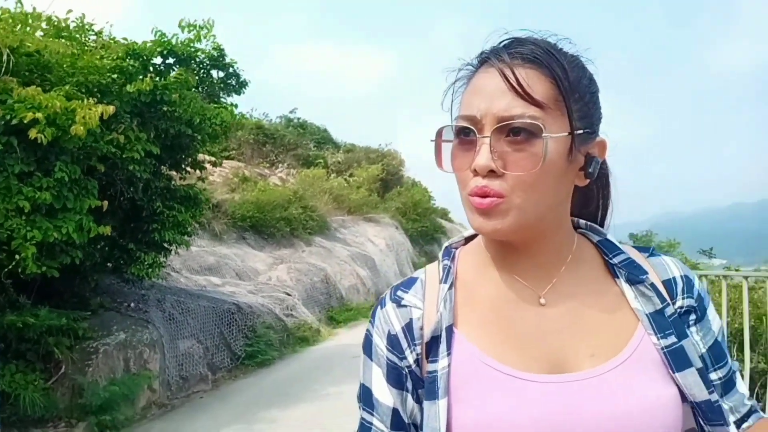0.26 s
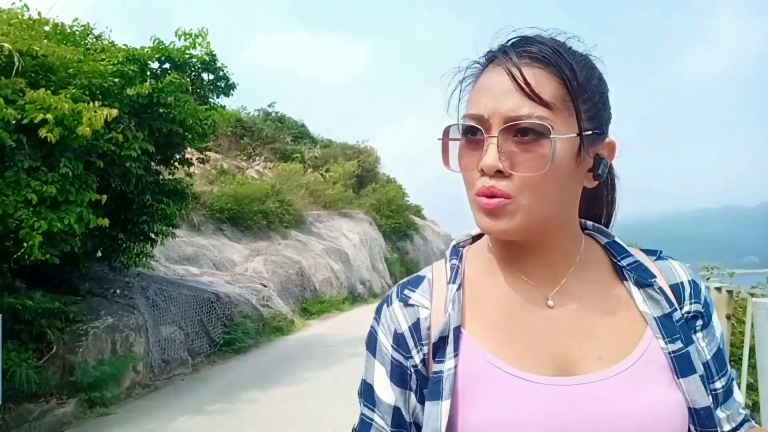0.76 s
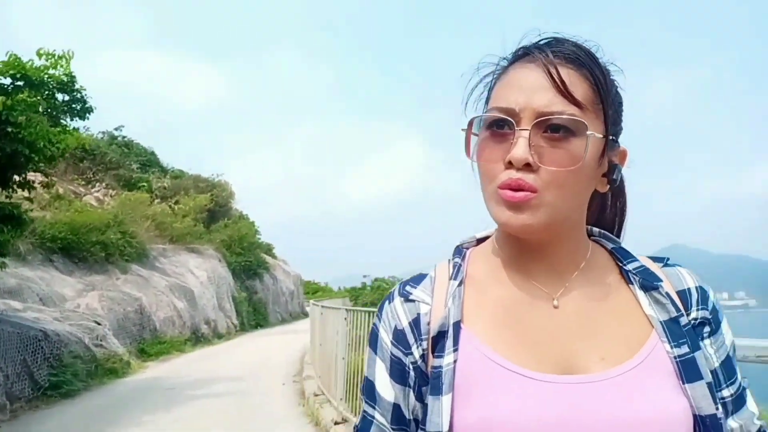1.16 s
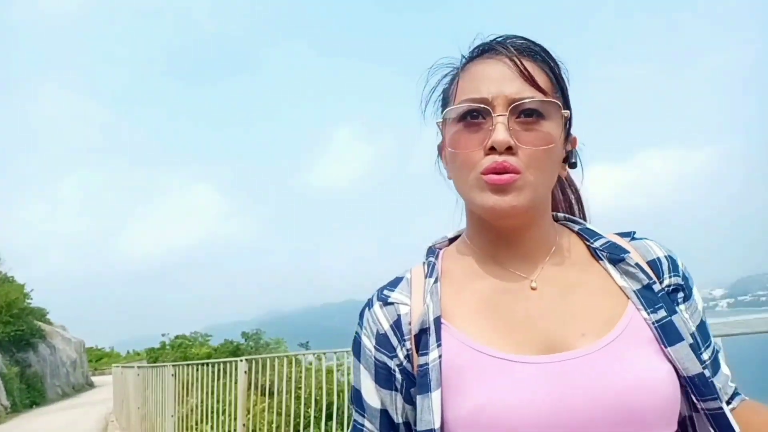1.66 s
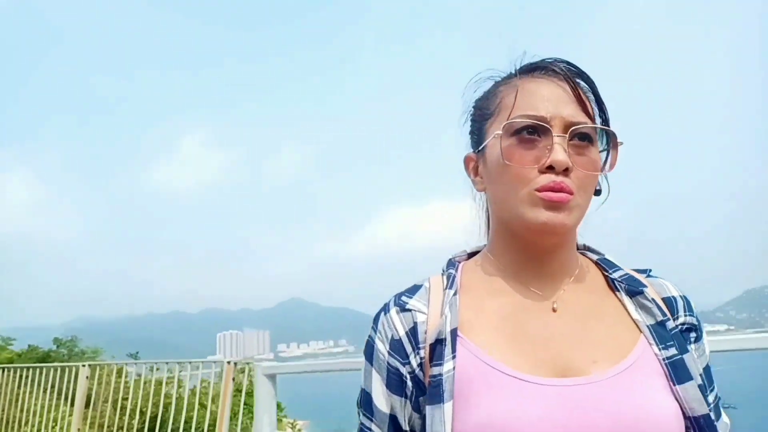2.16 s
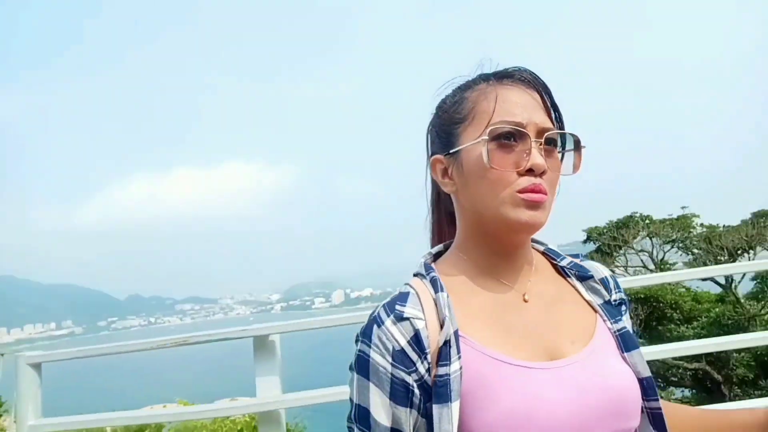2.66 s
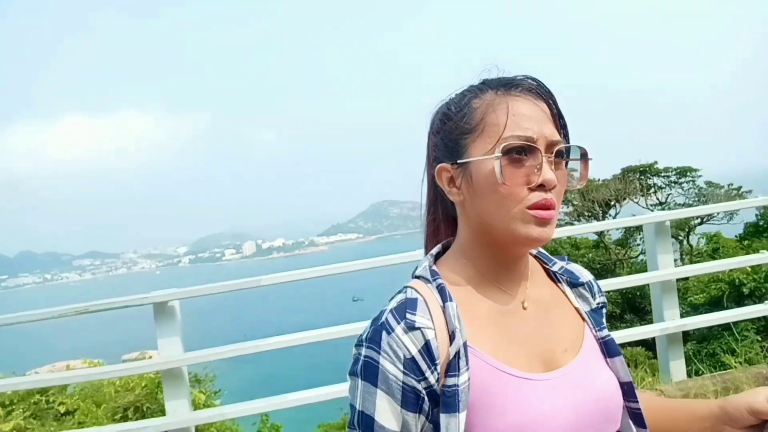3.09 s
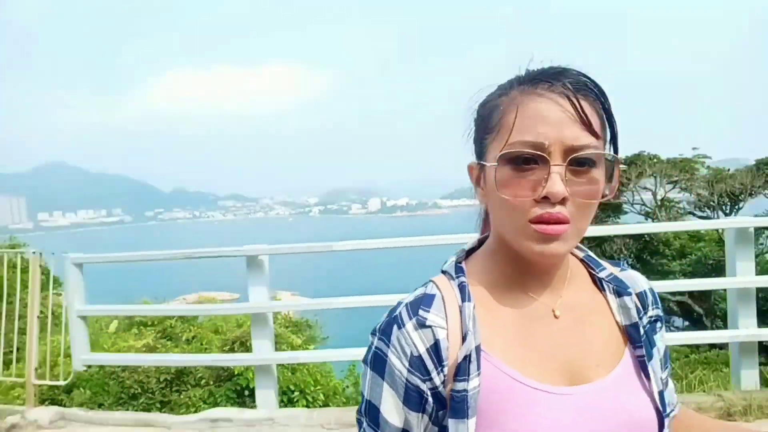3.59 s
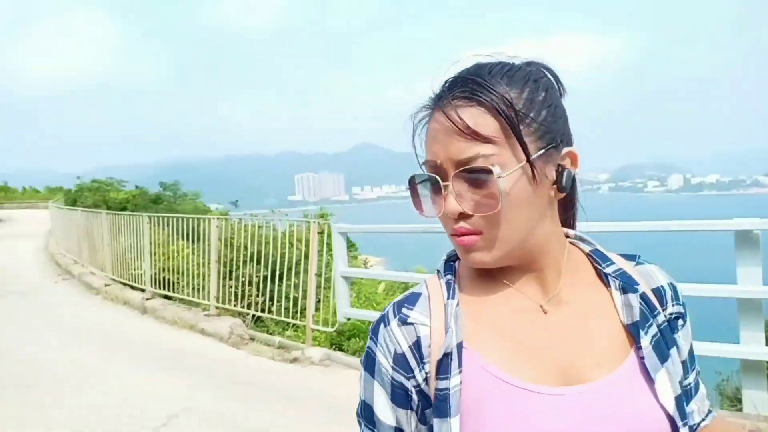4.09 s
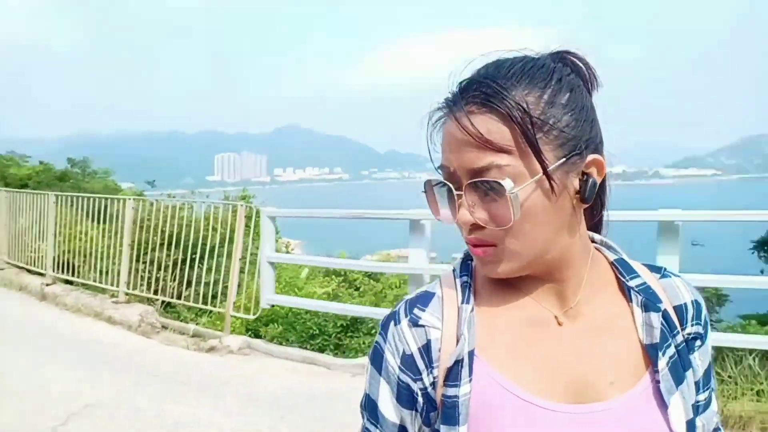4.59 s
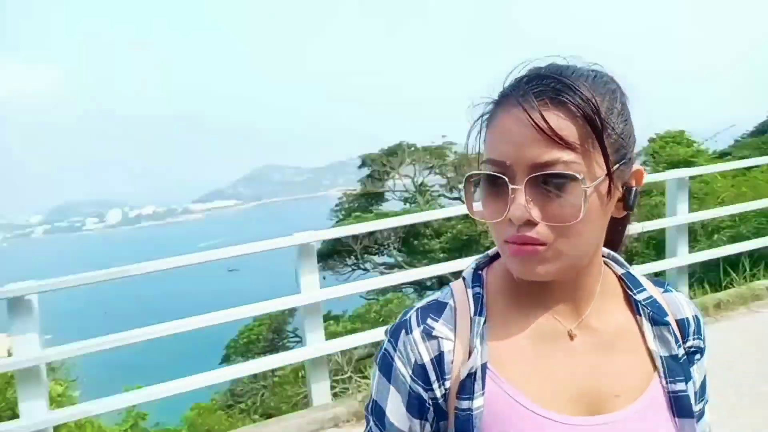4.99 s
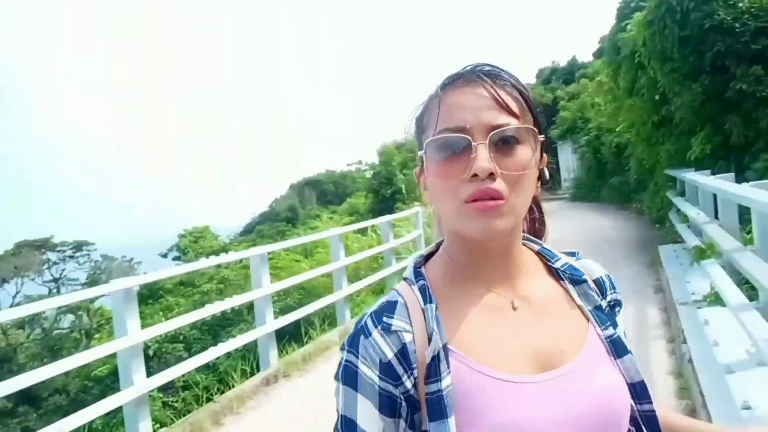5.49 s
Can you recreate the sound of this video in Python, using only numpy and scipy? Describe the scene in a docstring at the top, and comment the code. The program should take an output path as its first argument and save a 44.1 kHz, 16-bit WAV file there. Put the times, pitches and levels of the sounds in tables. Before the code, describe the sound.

Irregular low wind buffets rumble against the microphone over a pulsing cicada buzz, faint far birds and occasional small handling ticks.

```python
"""A windy hillside road, on a hand-held phone. Cicadas buzz their ribbed drums: one kind throbs near
5 kHz as the bellies pump, another swells and breaks off higher up, and a far chorus hisses over a hush
of leaves and sea. Small birds chirp in the distance. Right at the microphone, gusts buffet the port,
and now and then the grip clicks and clothes rustle."""
import sys
import numpy as np
from scipy import signal
from scipy.fft import rfft, irfft, next_fast_len
from scipy.io import wavfile
from scipy.ndimage import uniform_filter1d

SR = 44100
rng = np.random.default_rng(int(sys.argv[2]) if len(sys.argv) > 2 else 0)


def wav_out(sig):
    """Save sig, one row per channel (or a flat mono array), as 16-bit PCM at SR to the path in sys.argv[1]."""
    wavfile.write(sys.argv[1], SR, np.round(np.clip(np.atleast_2d(sig).T, -1, 1) * 32767).astype(np.int16))


N = 253262

# hush of leaves and sea: freq_hz, density_db
HUSH_SPECTRUM = [(30, -44), (60, -9.5), (140, -3), (237, -5.5), (312, -7), (751, -17), (1300, -25),
                 (2150, -29), (4240, -30.5), (6330, -34), (9000, -26), (12100, -37), (16000, -26)]
# rise and fall of the hush: time_s, level_db
HUSH_LEVEL = [(0, -47.5), (.6, -46.5), (2.05, -45), (2.65, -48), (3.05, -44.5), (3.9, -46), (4.55, -49),
              (4.95, -44), (5.25, -49.5), (5.74, -46.5)]
# wind at the microphone port: time_s, level_db
GUST_LEVEL = [(0, -41), (.17, -42.5), (.34, -54), (.42, -29), (.75, -35), (1.1, -41), (1.3, -34.5),
              (1.5, -38), (1.8, -43.5), (2.5, -50), (2.75, -41), (2.97, -34), (3.15, -16.5), (3.31, -34.5),
              (3.85, -31.5), (4.12, -35.5), (4.22, -43.5), (4.6, -51), (4.85, -45), (5.6, -47.5),
              (5.74, -42)]
# rumble of small eddies: freq_hz, density_db
EDDY_SPECTRUM = [(15, -48), (30, -31), (57, -4), (80, 0), (120, -3.5), (168, -8.5), (318, -21.5),
                 (490, -38), (900, -75)]
# strong eddies hitting the microphone: time_s, peak_db, width_ms
BUFFETS = [(0.391, -20, 29), (0.444, -20, 8.1), (0.469, -21, 10.3), (0.541, -14.5, 5.1),
           (0.564, -18.5, 4.6), (0.61, -22.5, 17), (0.655, -16.5, 13.8), (0.7, -17, 11.5), (.729, -26, 7.7),
           (.822, -24.5, 6.3), (0.841, -19, 12), (0.874, -23, 13.4), (0.959, -21, 11.8), (1.285, -27, 17.5),
           (1.321, -21.5, 19), (1.38, -20, 17), (1.418, -27, 17), (1.451, -20, 9.2), (1.636, -17, 10),
           (2.696, -26.5, 16.3), (2.836, -22.5, 5.1), (2.867, -10.5, 20), (2.894, -13, 13.9),
           (2.929, -22, 20), (3.01, -20.5, 20.5), (3.051, -12, 8.7), (3.084, -10.5, 5.3), (3.116, -2.5, 11),
           (3.178, -13.5, 18), (3.217, -14, 7.5), (3.242, -13.5, 5.1), (3.265, -23, 6.2),
           (3.347, -13.5, 5.6), (3.4, -22.5, 8.9), (3.444, -22, 25), (3.488, -21.5, 11), (3.598, -26, 8.2),
           (3.63, -20.5, 16.5), (3.655, -16.5, 9.2), (3.688, -18, 9), (3.811, -10.5, 9.1),
           (3.861, -17, 13.3), (3.939, -25.5, 25.4), (4.02, -21.5, 14), (4.09, -26.5, 10.4),
           (4.154, -23, 31), (4.752, -22.5, 21), (5.44, -27.5, 9.4), (5.462, -27, 13.5)]
# drum resonances of the throbbing cicadas: centre_hz, width_hz, gain_db
TYMBAL_MODES = [(4910, 220, 2), (5095, 300, 7), (5222, 354, 8), (5374, 160, -1.5)]
# their drone, before the throb: time_s, level_db
DRONE_LEVEL = [(0, -55.5), (.3, -54), (.65, -50.5), (1.2, -52), (1.8, -52.5), (2.1, -49), (2.65, -53),
               (2.9, -50), (3.35, -46.5), (3.9, -48), (4.3, -50), (4.62, -52.5), (4.85, -48.5), (5.25, -48),
               (5.55, -48.5), (5.74, -49.5)]
# bouts of bellies pumping in step: middle_s, length_s, crest_s, pump_hz, depth_db
THROB_BOUTS = [(.1, .6, .18, 7.8, 5), (1.3, 1.6, 1.16, 7.5, 6.5), (2.75, 1.9, 2.803, 8.05, 10.5),
               (4.2, 1.1, 4.215, 7.6, 5), (5.0, .9, 5.129, 7.4, 9), (5.6, .55, 5.59, 7.6, 5)]
# the far chorus in two bands: time_s, low_db, high_db
CHORUS_LEVELS = [(0.0, -66, -59), (0.38, -61.5, -62), (1.93, -56.5, -56), (2.19, -61, -57),
                 (2.61, -60, -57), (3.1, -62, -56), (3.49, -51.5, -54), (3.77, -67, -57), (3.97, -68, -63),
                 (4.3, -65, -63), (4.44, -77, -69), (4.68, -66, -74), (4.87, -55, -66), (5.2, -69, -74),
                 (5.5, -74, -67), (5.74, -59, -56)]
# resonances of its low and its high band: centre_hz, width_hz, gain_db
CHORUS_LOW_MODES = [(8260, 930, 0)]
CHORUS_HIGH_MODES = [(14400, 1600, -8.5), (15470, 640, 1)]
# body resonances of the swelling cicada: centre_hz, width_hz, gain_db
SWELL_MODES = [(7430, 730, 0), (9010, 2260, 4), (10250, 1400, -0.5)]
# its calls: start_s, break_off_s, top_db
SWELL_CALLS = [(.6, 1.0, -60), (1.89, 2.365, -49), (3.043, 3.73, -54), (3.9, 4.222, -60),
               (4.6, 5.027, -51.5)]
# ringing of the plastic grip: pitch_hz, gain_db, t60_ms
GRIP_MODES = [(1700, 0.5, 4.8), (2960, -5.5, 2.8), (4020, 9.5, 1.85), (6300, -2.5, 2.5), (8470, 5, 4.6),
              (12900, 5.5, 5.9)]
# clicks of the grip: start_s, peak_db, centre_hz, spread_octaves
GRIP_CLICKS = [(.306, -35.5, 2600, 0.33), (.33, -35.5, 3200, 0.4), (0.6719, -18.5, 4000, 0.23),
               (0.6828, -18, 5430, 0.57), (0.868, -27.5, 3280, 0.33), (1.004, -43, 1500, 0.43),
               (1.3224, -35, 3000, 1.1), (1.433, -36, 3000, 0.48), (1.4985, -37, 2500, 0.73),
               (2.611, -38.5, 1500, .3), (3.496, -37, 4200, .2), (3.715, -33, 4000, 1.1),
               (3.8736, -30.5, 9000, 0.7), (4.675, -45, 2500, .8), (5.1858, -26.5, 3000, 1.2),
               (5.2024, -32, 2600, 0.36), (5.4042, -37, 3600, .4)]
# far birds, clear falling whistles: start_s, length_s, pitch_hz, level_db
BIRD_WHISTLES = [(.39, .026, 3280, -60), (.735, .027, 3260, -55), (.78, .02, 3300, -60),
                 (1.69, .03, 3290, -60), (1.73, .025, 3200, -67), (2.4, 0.023, 3260, -64),
                 (2.45, 0.015, 3300, -59), (2.475, .018, 3190, -60), (2.92, 0.021, 3280, -60),
                 (3.245, 0.045, 3250, -58), (3.525, 0.03, 3300, -53), (3.578, .033, 3320, -60),
                 (3.695, .015, 3280, -59), (3.91, 0.042, 3200, -61), (4.04, .03, 3350, -58),
                 (4.092, .04, 3270, -55), (4.135, 0.042, 3300, -59), (4.648, .03, 3230, -65),
                 (4.68, 0.036, 3310, -61)]
# far birds, hoarse rising notes: start_s, length_s, pitch_hz, level_db
BIRD_RASPS = [(.55, .06, 2650, -59), (1.4, 0.043, 2760, -54.5), (2.31, 0.046, 2680, -55),
              (3.093, 0.028, 2820, -48), (3.185, 0.035, 2560, -56), (3.972, .025, 2720, -60),
              (4.105, 0.025, 2670, -55), (5.0, .056, 2690, -59)]
# rubbing cloth: freq_hz, density_db
CLOTH_SPECTRUM = [(500, 1), (1500, -3.5), (4200, 1.5), (6500, -3.5), (8500, -0.5), (12000, -8.5),
                  (15000, -4)]
# rustles close to the microphone: start_s, length_s, level_db
CLOTH_RUSTLES = [(3.418, 0.024, -34), (3.437, 0.021, -39.5), (3.877, 0.015, -53.5), (5.661, 0.023, -52),
                 (5.677, .05, -41.5)]


def undb(db):
    return 10 ** (np.asarray(db) / 20)


def unit(x):
    return x / np.sqrt(np.mean(x ** 2))


def curves(table):
    """The value columns of a timed table at every sample."""
    times, *columns = np.transpose(table)
    return [np.interp(np.arange(N) / SR, times, column) for column in columns]


def coloured(spectrum):
    """Noise of rms 1 with the given spectrum."""
    size = next_fast_len(N)
    hz, db = np.transpose(spectrum)
    bin_hz = np.arange(size // 2 + 1) * SR / size
    gain = undb(np.interp(np.log(bin_hz + 1), np.log(hz), db))
    return unit(irfft(rfft(rng.standard_normal(size)) * gain, size)[:N])


def ring(x, modes):
    """Steep resonances (each applied twice), summed."""
    out = 0
    for hz, width_hz, db in modes:
        b, a = signal.iirpeak(hz, hz / width_hz, fs=SR)
        out = out + undb(db) * signal.lfilter(b, a, signal.lfilter(b, a, x))
    return out


def wander(rate_hz):
    """Random steps at rate_hz, smoothed twice; rms 1."""
    hold = int(SR / rate_hz)
    steps = np.repeat(rng.standard_normal(N // hold + 1), hold)
    return unit(uniform_filter1d(uniform_filter1d(steps, hold), hold)[:N])


def add(out, start_s, piece):
    """Mixes a short sound in at start_s."""
    i = max(int(start_s * SR), 0)
    out[i:i + len(piece)] += piece[:N - i]


def leaves_and_sea():
    """A low wash of distant sea under leaves that stir fitfully."""
    hush = coloured(HUSH_SPECTRUM)
    sea = signal.sosfiltfilt(signal.butter(2, 1000., fs=SR, output="sos"), hush)
    leaves = undb(1.26 * wander(9)) * (hush - sea)
    return undb(curves(HUSH_LEVEL)[0]) * (sea + leaves)


def wind_on_microphone(deep_hz=75.4, lull_db=-41, buffet_hz=114.03, scatter_hz=9.17):
    """Small eddies rumble at the port; each strong one briefly shakes the membrane, sinking in pitch."""
    gust_db, eddies = curves(GUST_LEVEL)[0], coloured(EDDY_SPECTRUM)
    deep = signal.sosfiltfilt(signal.butter(2, deep_hz, fs=SR, output="sos"), eddies)
    deep_db = 0.7 * np.minimum(gust_db - lull_db, 0)  # the deepest eddies die away in lulls
    out = undb(gust_db + 4.1 * wander(30)) * (eddies - deep + undb(deep_db) * deep)
    t = np.arange(-SR // 10, SR // 10) / SR
    for time_s, peak_db, width_ms in BUFFETS:
        phase, chance = rng.random(2)
        widths = t / (width_ms / 1000)
        envelope = undb(peak_db) * np.exp(-np.log(16) * widths ** 2)
        hz = buffet_hz + 1.14 * (peak_db + 20) - 0.888 * (width_ms - 10)  # strong, short ones are higher
        pitch_hz = (hz + scatter_hz * (2 * chance - 1)) * np.exp(-.3 * np.tanh(widths))
        add(out, time_s - .1, envelope * np.cos(2 * np.pi * (np.cumsum(pitch_hz) / SR + phase)))
    return out


def tymbal_buzz(twitch_hz, burst, blur):
    """Each muscle twitch sets off a burst of rib clicks for a share of the cycle; echoes blur the gaps."""
    phase = np.cumsum(twitch_hz * (1 + 0.012 * wander(6))) / SR % 1
    return (blur + np.exp(-phase / burst)) * rng.standard_normal(N)


def throbbing_cicadas(waver_db=2):
    """Bellies pump some eight times a second, opening the drum's sound at each crest; in step, it throbs."""
    t, level_db = np.arange(N) / SR, curves(DRONE_LEVEL)[0]
    for middle_s, length_s, crest_s, pump_hz, depth_db in THROB_BOUTS:
        in_step = np.cos(np.pi * np.clip((t - middle_s) / length_s, -.5, .5))
        level_db += depth_db / 2 * in_step * np.cos(2 * np.pi * pump_hz * (t - crest_s))
    song = tymbal_buzz(twitch_hz=106., burst=0.51, blur=0.66)
    song += 0.74 * tymbal_buzz(twitch_hz=113., burst=0.44, blur=0.6)
    # each resonance comes and goes as singers of other sizes take over
    waver = np.array([wander(22.01) for _ in TYMBAL_MODES])
    gains = undb(waver_db * (waver - waver.mean(axis=0)))
    drums = sum(gain * ring(song, [mode]) for gain, mode in zip(gains, TYMBAL_MODES))
    return undb(level_db) * unit(drums)


def far_chorus():
    """So many far insects that their pulses melt into two flickering bands."""
    low_db, high_db = curves(CHORUS_LEVELS)
    low = undb(low_db + 1.3 * wander(9.3)) * unit(ring(rng.standard_normal(N), CHORUS_LOW_MODES))
    high_gain = undb(high_db + 1.2 * wander(25))
    pulses = tymbal_buzz(twitch_hz=48., burst=0.54, blur=1.2)
    return low + high_gain * unit(ring(pulses, CHORUS_HIGH_MODES))


def swelling_cicada(rest_db=-62.5, rise_share=0.46, sag_db=1, break_s=.025, rib_hz=350.):
    """A broad dry buzz, about three rib bursts a twitch; each call swells, sags and breaks off."""
    t, level_db = np.arange(N) / SR, np.full(N, rest_db)
    for start_s, end_s, top_db in SWELL_CALLS:
        times = [start_s, start_s + rise_share * (end_s - start_s), end_s, end_s + break_s]
        call_db = np.interp(t, times, [rest_db, top_db, top_db - sag_db, rest_db])
        level_db = np.maximum(level_db, call_db)
    ribs = 1 + 0.45 * np.cos(2 * np.pi * rib_hz * t)
    song = ribs * tymbal_buzz(twitch_hz=102., burst=0.43, blur=0.49)
    return undb(level_db) * unit(ring(song, SWELL_MODES))


def grip_clicks():
    """Dry ticks right at the phone: each blow rings the grip's modes nearest its own colour."""
    out, t = np.zeros(N), np.arange(SR // 50) / SR
    hz, gain_db, t60_ms = np.transpose(GRIP_MODES)[:, :, None]
    attack = 1 - np.exp(-t / .0001)
    modes = attack * undb(gain_db - 60 * t / (t60_ms / 1000)) * np.sin(2 * np.pi * hz * t)
    for start_s, peak_db, centre_hz, spread_octaves in GRIP_CLICKS:
        weights = np.exp(-.5 * (np.log2(hz / centre_hz) / spread_octaves) ** 2)
        tick = np.sum(weights * modes, axis=0)
        add(out, start_s, undb(peak_db) * tick / np.max(np.abs(tick)))
    return out


def far_birds(whistle_slur_hz=-170, rasp_slur_hz=120, flutter_hz=182.):
    """Wavering near-sine slurs, scattered by the slope; the hoarse notes flutter fast."""
    out, waver = np.zeros(N), 0.0097 * wander(150)
    for notes, slur_hz, harsh in ((BIRD_WHISTLES, whistle_slur_hz, 0), (BIRD_RASPS, rasp_slur_hz, .85)):
        for start_s, length_s, pitch_hz, level_db in notes:
            t = np.arange(int(length_s * SR)) / SR
            hz = pitch_hz + slur_hz * (1 - (1 - t / length_s) ** 1.28)
            hz *= 1 + (1 + 2 * harsh) * waver[int(start_s * SR):][:len(t)]
            flutter = unit(np.exp(1.3 * harsh * np.cos(2 * np.pi * flutter_hz * t)))
            envelope = undb(level_db) * np.sin(np.pi * t / length_s) ** 0.25
            add(out, start_s, envelope * flutter * np.sin(2 * np.pi * np.cumsum(hz) / SR))
    slope_tail = np.exp(-np.arange(SR // 8) / SR / 0.03) * rng.standard_normal(SR // 8)
    return out + undb(-30.5) * signal.fftconvolve(out, slope_tail)[:N]


def clothes():
    """Cloth dragged in uneven grains, close to the microphone."""
    out = np.zeros(N)
    cloth = coloured(CLOTH_SPECTRUM) * undb(3.6 * wander(400))
    for start_s, length_s, level_db in CLOTH_RUSTLES:
        progress = np.arange(int(1.3 * length_s * SR)) / SR / length_s
        envelope = undb(level_db) * np.minimum(progress / 0.019, 1) / (1 + progress ** 6)
        add(out, start_s, envelope * cloth[int(start_s * SR):][:len(progress)])
    return out


def scene():
    """The hillside in mono; moving air makes the swelling cicada, chorus and hush waver together."""
    flicker = undb(1.13 * wander(5.76) + 0.82 * wander(24.93))
    hillside = throbbing_cicadas() + flicker * (swelling_cicada() + far_chorus() + leaves_and_sea())
    distant_birds = far_birds()
    close_up = wind_on_microphone() + grip_clicks() + clothes()
    return (hillside + distant_birds + close_up)[None]


def record(dry):
    """The phone cuts the top steeply above 15.75 kHz."""
    return signal.sosfilt(signal.ellip(10, .2, 80, 15750, fs=SR, output="sos"), dry)


dry = scene()
out = record(dry)
wav_out(out)
```